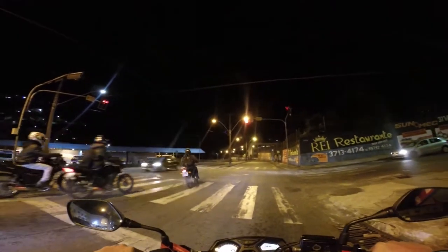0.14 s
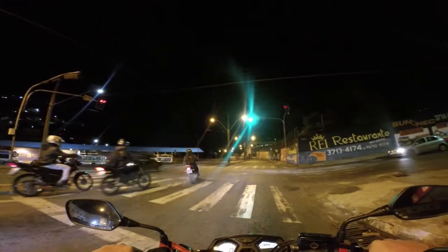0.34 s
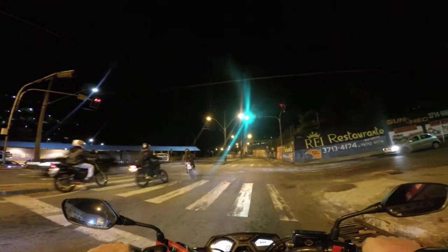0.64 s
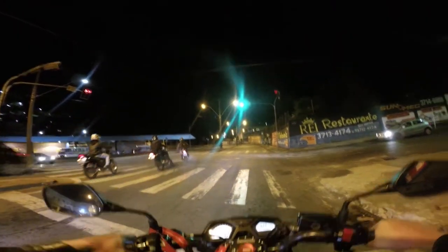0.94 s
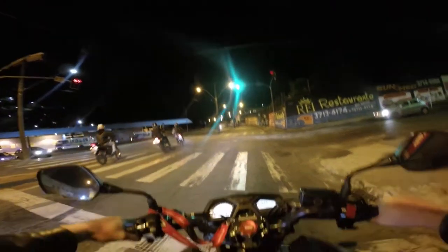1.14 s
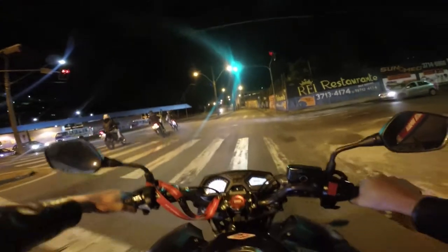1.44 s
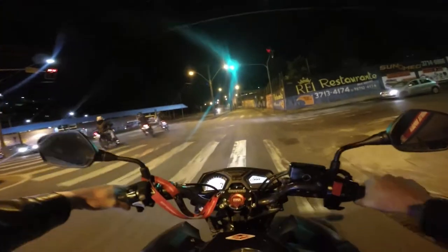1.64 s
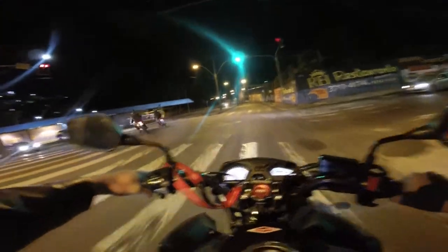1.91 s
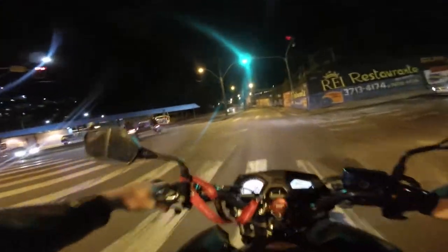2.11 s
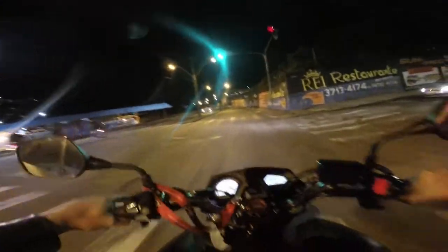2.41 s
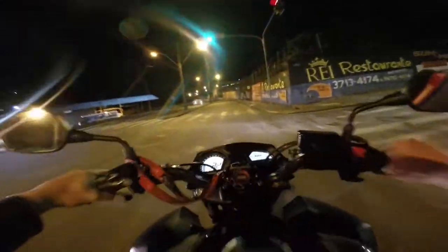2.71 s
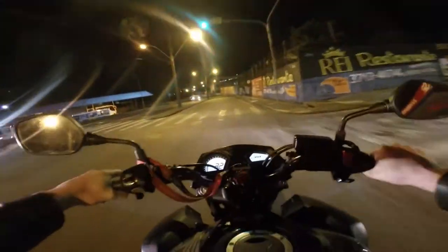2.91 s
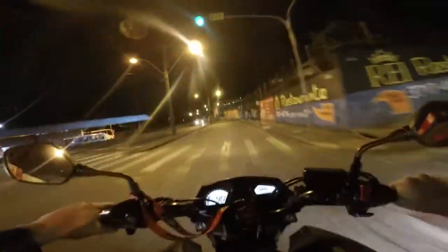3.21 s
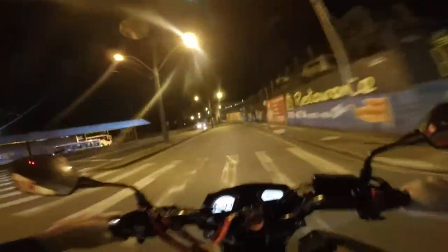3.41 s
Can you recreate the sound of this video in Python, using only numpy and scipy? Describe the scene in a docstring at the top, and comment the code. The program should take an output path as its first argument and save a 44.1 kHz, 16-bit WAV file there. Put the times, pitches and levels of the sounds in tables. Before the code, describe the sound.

Four-cylinder motorcycle idles low, then pulls away with rising revs as two smaller bikes recede ahead.

```python
"""A four-cylinder motorcycle, heard from the rider's helmet, idles at a junction, takes up the clutch and pulls away.
Two single-cylinder bikes leave just ahead: one thumps and cracks, the other ticks and chirps; both recede.
The four is a sum of firing harmonics with pulsed intake noise, and a throttle rasp of noise gated by the firings.
The singles are trains of impulses that ring coloured bodies or set off noise bursts and falling whistles.
Street noise lies underneath, sinking as the bikes leave and partly returning."""
import sys
import numpy as np
from scipy import signal
from scipy.fft import rfft, irfft
from scipy.io import wavfile
from scipy.ndimage import uniform_filter1d

SR = 44100
rng = np.random.default_rng(int(sys.argv[2]) if len(sys.argv) > 2 else 0)


def store_pcm(level_fs):
    """Save levels as 16-bit WAV."""
    pcm = np.round(np.clip(level_fs, -1, 1) * 32767).astype(np.int16)
    wavfile.write(sys.argv[1], SR, np.atleast_2d(pcm).T)


N = 156555
T = np.arange(N) / SR  # time of every sample [s]

# Firing rate of the four-cylinder engine, all cylinders together: (time [s], rate [Hz])
FOUR_FIRING_RATE = [(0.0, 51.6), (0.5, 51.8), (0.76, 51.9), (0.85, 83.4), (0.96, 93.4), (1.07, 81.0),
                    (1.17, 81.9), (1.35, 76.7), (1.55, 80.8), (1.8, 87.7), (1.92, 85.7), (2.1, 78.5),
                    (2.32, 98.4), (2.48, 108.7), (2.66, 127.1), (2.77, 133.9), (2.84, 133.8), (2.89, 142.6),
                    (3.04, 156.7), (3.14, 160.4), (3.25, 173.9), (3.3, 171.1), (3.36, 181.5), (3.55, 193.5)]


def amp(db):
    """Decibels to gain."""
    return 10 ** (np.asarray(db) / 20)


def unit(x):
    """Scales to rms 1."""
    return x / np.sqrt(np.mean(x ** 2) + 1e-20)


def curve(table, order=1):
    """One column of a time table, read at every sample."""
    rows = np.array(table)
    return np.interp(T, rows[:, 0], rows[:, order])


def colour(table, hz):
    """Gain of a spectrum table at these frequencies, interpolated over log frequency."""
    f, db = np.transpose(table)
    return amp(np.interp(np.log(hz + 1), np.log(f), db))


def noise(table):
    """Steady noise of the given colour, at rms 1."""
    spectrum = rfft(rng.standard_normal(N))
    return unit(irfft(spectrum * colour(table, np.fft.rfftfreq(N, 1 / SR)), N))


def wander(hz):
    """Random drift of rms 1, gliding to a new value hz times a second."""
    return unit(np.interp(T * hz, np.arange(2048), rng.standard_normal(2048)))


def ring(x, table, size=4096):
    """Passes x through a minimum-phase body of the given colour and unit energy."""
    log_gain = np.log(colour(table, abs(np.fft.fftfreq(size, 1 / SR))))
    minimum_phase = np.exp(np.conj(signal.hilbert(log_gain)))
    body = np.fft.ifft(minimum_phase).real[:size // 2]
    return signal.oaconvolve(x, body / np.linalg.norm(body))[:N]


def firings(rate, first_s, scatter_db):
    """One impulse per firing, each of slightly different strength."""
    cycles = np.cumsum(curve(rate)) / SR
    since_first = cycles - np.interp(first_s, T, cycles)
    at = np.flatnonzero(np.diff(np.floor(since_first)) > 0)
    train = np.zeros(N)
    train[at] = amp(scatter_db * np.clip(rng.standard_normal(len(at)), -2, 2))
    return unit(train)


def puffs(train, decay_s, rise_s):
    """A short burst of gas noise swells and dies after each impulse."""
    t = T[:2048]
    burst = (1 - np.exp(-t / rise_s)) ** 2 * np.exp(-t / decay_s)
    return unit(signal.oaconvolve(train, burst)[:N] * rng.standard_normal(N))


def patchy(x, depth_db):
    """Mottles the colour at random, in patches of about 20 ms by 1.2 kHz."""
    z = signal.stft(x, nperseg=256, noverlap=192)[2]
    grain = rng.standard_normal(z.shape[::-1])  # frames by frequency bins
    patches = unit(uniform_filter1d(uniform_filter1d(grain, 14, 0), 7, 1)).T
    mottled = z * amp(depth_db * np.clip(patches, -2, 2))
    return signal.istft(mottled, nperseg=256, noverlap=192)[1][:N]


def echoes(x, size=8192):
    """Street reflections: three decaying noise tails whose shares of the sound turn over continually."""
    t60_s, gap_s = 0.1, .004
    t = T[:size]
    tails = rng.standard_normal((3, size)) * amp(-60 * t / t60_s) * (t > gap_s)
    total = np.zeros(N)
    for k, tail in enumerate(tails):
        share = np.cos(np.pi * (T * 4 + k / len(tails)))
        total += signal.oaconvolve(x * share, tail / np.linalg.norm(tail))[:N]
    return total * np.sqrt(2 / len(tails))


def four_cylinder(count=60):
    """Low boom, wavering pipe harmonics, quarter-order lines from unequal cylinders and pulsing intake rush."""
    # Loudness under load: (time [s], fundamental [dB], second harmonic [dB], upper lines [dB])
    load = [(0, -23, -37, -52.5), (0.75, -20.5, -29.5, -33), (0.92, -21.5, -18, -28.5),
            (1.07, -16, -16, -28.5), (1.4, -19, -18.5, -27), (1.8, -18, -17, -25.5),
            (2.18, -16.5, -17, -28.5), (2.35, -14.5, -17.5, -24), (2.6, -14.5, -21, -24),
            (2.8, -12.5, -24.5, -19), (3, -15, -26, -17.5), (3.15, -13.5, -29.5, -18.5),
            (3.32, -13, -40, -16.5), (3.52, -12.5, -22.5, -14)]
    # Colour the pipe gives the upper lines: (frequency [Hz], level [dB])
    pipe_tone = [(150, 1.5), (200, -4.5), (255, -1), (290, -8), (340, -16.5), (400, -3.5), (480, 0),
                 (560, -4), (650, -12), (750, -13.5), (900, -24), (1000, -29), (1090, -22), (1200, -32),
                 (1420, -24), (1700, -39), (2200, -39), (3000, -41)]
    # Lines between the harmonics, before their flicker: (time [s], level relative to the harmonics [dB])
    uneven_level = [(0, -13), (1.1, -11.5), (1.8, -11.5), (2.3, -7), (2.7, -4.5), (3.55, -23.5)]
    # Intake rush loudness: (time [s], level [dB])
    rush_level = [(0, -38), (.8, -39.5), (1.1, -32.5), (1.7, -36), (2.15, -34), (2.45, -31), (2.8, -27),
                  (3.15, -30), (3.55, -26)]
    # Intake rush colour: (frequency [Hz], level [dB])
    rush_tone = [(25, -6), (50, 4.5), (80, 0), (140, 2), (320, -1.5), (550, 2), (900, -4), (1400, -12.5),
                 (2600, -23.5), (3500, -20), (4100, -30), (4700, -28), (5500, -38), (8500, -32),
                 (12000, -48), (15500, -51)]
    pipe_lead_s, waver_hz, waver_depth, rush_pulsing = .0002, 25.03, .2, .6

    hz = curve(FOUR_FIRING_RATE)
    angle = 2 * np.pi * np.cumsum(hz) / SR
    boom = np.zeros(N)
    for k in (1, 2):
        boom += amp(curve(load, order=k)) * np.cos(k * angle) * (1 + 0.018 * wander(waver_hz))

    uneven, pipe = amp(curve(uneven_level)), np.zeros(N)
    for k in range(3, count):
        order = k / 4  # four firings make one full engine cycle
        if order in (1, 2):  # already in the boom
            continue
        if order % 1 == 0:
            strength = 1 + waver_depth * wander(waver_hz)
        else:
            strength = uneven * (0.4 + 0.62 * wander(waver_hz))
        lead = 2 * np.pi * order * hz * pipe_lead_s
        pipe += strength * colour(pipe_tone, order * hz) * np.cos(order * angle + lead)

    tones = np.sqrt(2) * (boom + amp(curve(load, order=3)) * pipe)  # root 2: a level is a sine's rms
    rush = noise(rush_tone) * unit(1 + rush_pulsing * np.cos(angle))
    return tones + amp(curve(rush_level)) * rush


def rasp():
    """On open throttle each firing barks as decaying noise, one cylinder harder than the rest."""
    # Rasp loudness: (time [s], level [dB])
    rasp_level = [(0, -67), (1.1, -50.5), (1.8, -45.5), (2.2, -49), (2.5, -43), (2.8, -32), (3.15, -33.5),
                  (3.55, -31)]
    # Rasp colour: (frequency [Hz], level [dB])
    rasp_tone = [(300, -24), (750, 5.5), (950, -8), (1100, 2.5), (1220, -1), (1450, -1), (1700, -7.5),
                 (2100, -13), (2700, -19.5), (6000, -39)]
    accent_db, decay_firings = 4.5, 0.81  # decay in firing intervals

    fired = np.cumsum(curve(FOUR_FIRING_RATE)) / SR
    accent = np.where(np.floor(fired) % 4 == 0, amp(accent_db), 1)  # every fourth firing
    gate = accent * np.exp(-(fired % 1) / decay_firings)
    return amp(curve(rasp_level)) * ring(unit(gate * rng.standard_normal(N)), rasp_tone)


def thumping_bike():
    """Each firing rings a low exhaust thump and a casing clank, and sets off a sharp crack of gas noise."""
    # Firing rate: (time [s], rate [Hz])
    thumper_rate = [(0, 32.94), (0.25, 32.88), (0.7, 31.08), (1, 30.94), (1.3, 33.38), (1.55, 31.84),
                    (1.75, 25.9), (2.3, 29.08), (3.55, 33.97)]
    # Loudness: (time [s], thump [dB], crack before its flicker [dB])
    thumper_level = [(0, -19, -45), (.6, -21, -42.5), (.76, -18, -40.5), (.86, -23.5, -46),
                     (1.08, -25, -42.5), (1.45, -24.5, -51), (1.68, -41, -58), (2.15, -55, -61),
                     (2.36, -34, -53), (2.65, -33, -54), (3.55, -51, -64)]
    # Exhaust thump colour: (frequency [Hz], level [dB])
    thump_tone = [(25, -38.5), (65, -7.5), (100, 0), (160, 7), (200, -1.5), (258, 1), (290, 2), (335, 2),
                  (385, -7.5), (450, -4.5), (600, -19.5), (780, -24.5), (1300, -34.5), (1850, -30.5),
                  (2150, -26.5), (2550, -62), (8000, -67)]
    # Gas crack colour: (frequency [Hz], level [dB])
    crack_tone = [(500, -47), (2000, 6), (2600, -5), (5000, -3.5), (7000, -3), (8300, -1), (10000, -1.5),
                  (12500, -10), (15500, -7)]
    # Casing clank, strongest while the bike is alongside: (time [s], level [dB])
    clank_level = [(0, -26.5), (.3, -29.5), (.55, -37.5), (1.1, -47)]
    # Casing clank colour: (frequency [Hz], level [dB])
    clank_tone = [(120, -31), (215, -7), (250, 9), (300, -11.5), (600, -37.5), (1700, -27.5), (2130, -12.5),
                  (2500, -37), (4600, -35), (5150, -23), (5700, -42), (12000, -54)]
    echo_db = -5

    train = firings(thumper_rate, first_s=.0085, scatter_db=2.0)
    thump = amp(curve(thumper_level)) * ring(train, thump_tone)
    clank = amp(curve(clank_level)) * ring(train, clank_tone)
    gas = patchy(ring(puffs(train, decay_s=0.0011, rise_s=.0016), crack_tone), depth_db=2.5)
    crack = amp(curve(thumper_level, order=2) + 2 * wander(30.04)) * gas
    direct = thump + clank + crack
    return direct + amp(echo_db) * echoes(direct)


def ticking_bike(size=900):
    """Each firing is a hissing tick of noise, plus a short falling whistle from the pipe."""
    # Firing rate: (time [s], rate [Hz])
    ticker_rate = [(0, 27.57), (0.3, 27.74), (0.6, 32.71), (1.05, 36.62), (1.33, 35.31), (1.6, 27.17),
                   (1.85, 24.4), (2.2, 25.57), (2.55, 27.85), (3.55, 32.66)]
    # Loudness: (time [s], tick [dB], chirp [dB])
    ticker_level = [(0, -32.5, -54), (.35, -41, -68), (.5, -42.5, -68), (.95, -46.5, -49),
                    (1.25, -61, -53.5), (1.37, -51, -46.5), (1.53, -55, -38), (1.67, -71, -53.5),
                    (1.83, -53.5, -40), (2.3, -44.5, -43.5), (2.52, -48, -44), (2.7, -53, -60),
                    (3.55, -61.5, -63)]
    # Tick colour: (frequency [Hz], level [dB])
    tick_tone = [(400, -12), (1500, 5.5), (2100, 4), (2600, -3.5), (3200, 7), (4300, 6.5), (5200, 4),
                 (6000, 2.5), (6600, 1.5), (7400, -1.5), (9100, 6), (10200, -3.5), (11500, -6),
                 (15500, -12)]
    # Whistle pitch, sagging during the gear change: (time [s], pitch ratio)
    chirp_pitch = [(1.35, 0.99), (1.7, 0.964), (2.0, 1.015), (2.5, 1.02)]
    # Whistle before the pitch ratio: start, random spread of the start as a fraction, fall
    base_hz, scatter, base_fall_hz_per_s = 3827, .015, 28000
    swell_s, overtone_db, echo_db = 0.0014, -18, -12.5

    train = firings(ticker_rate, first_s=.0185, scatter_db=2.5)
    hiss = ring(puffs(train, decay_s=0.0029, rise_s=.0016), tick_tone)
    tick = amp(curve(ticker_level)) * patchy(hiss, depth_db=3)

    t, chirps = T[:size], np.zeros(N + size)
    swell = (t / swell_s) ** 2 * np.exp(-t / swell_s)
    for at in np.flatnonzero(train):
        hz = base_hz * (1 + scatter * rng.standard_normal()) - base_fall_hz_per_s * t
        ratio = np.interp(at / SR, *np.transpose(chirp_pitch))
        angle = 2 * np.pi * np.cumsum(hz * ratio) / SR
        whistle = np.sin(angle) + amp(overtone_db) * np.sin(2 * angle)
        chirps[at:at + size] += train[at] * swell * whistle

    direct = tick + amp(curve(ticker_level, order=2)) * unit(chirps[:N])
    return direct + amp(echo_db) * echoes(direct)


def street():
    """Blurred noise of the other engines, made slightly lumpy by a fast random level."""
    # Loudness before the lumps: (time [s], level [dB])
    street_level = [(0, -23.5), (.7, -25), (1.25, -29.5), (1.65, -39), (2.1, -40), (3.55, -31.5)]
    # Colour: (frequency [Hz], level [dB])
    street_tone = [(25, -3), (100, 11), (300, 6.5), (600, -4), (1200, -9.5), (2000, -18), (2700, -21),
                   (4000, -21), (7000, -26.5), (9500, -33.5), (12000, -31.5), (15500, -84)]
    return amp(curve(street_level) + 2.2 * wander(90)) * noise(street_tone)


def scene():
    """All sources reach the helmet as one mono sum, the same in both channels."""
    mono = four_cylinder() + rasp() + thumping_bike() + ticking_bike() + street()
    return np.array([mono, mono])


def record(dry):
    """Peaks are rounded off below a ceiling; then a steep low-pass removes the extreme treble."""
    ceiling, edge_hz = .9, 15450
    held = dry / (1 + (dry / ceiling) ** 6) ** (1 / 6)
    low_pass = signal.firwin(401, edge_hz, window=("kaiser", 8), fs=SR)
    return signal.oaconvolve(held, low_pass[None], "same")


dry = scene()
out = record(dry)
store_pcm(out)
```